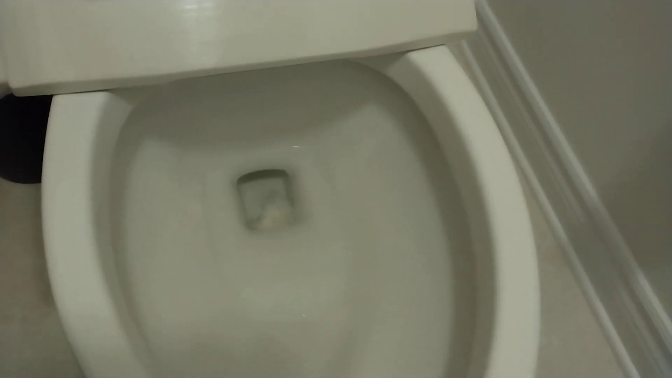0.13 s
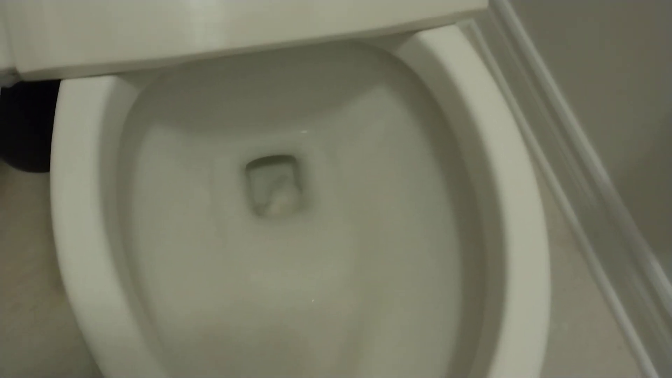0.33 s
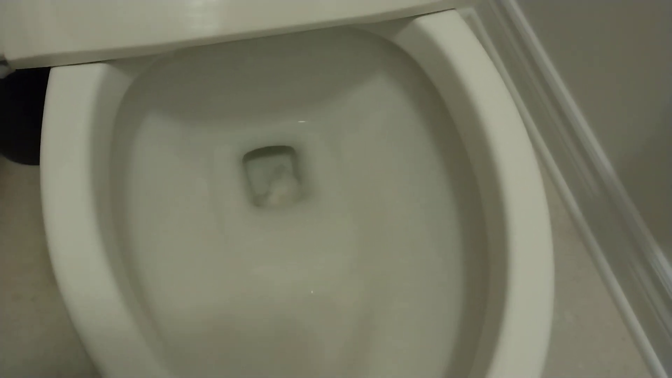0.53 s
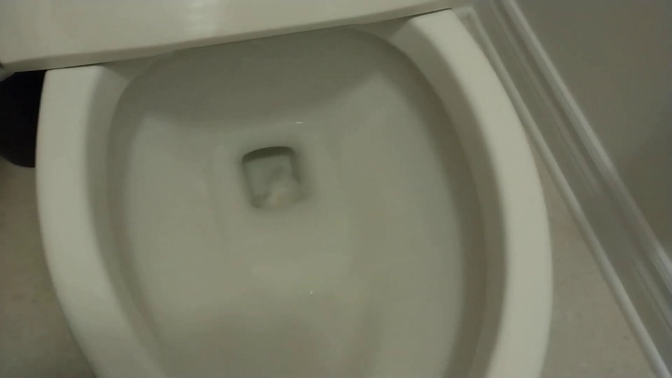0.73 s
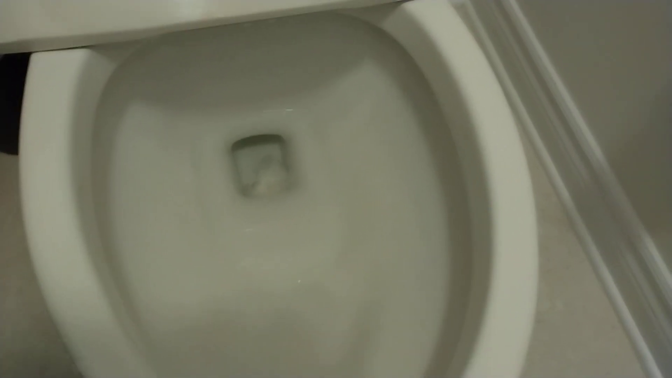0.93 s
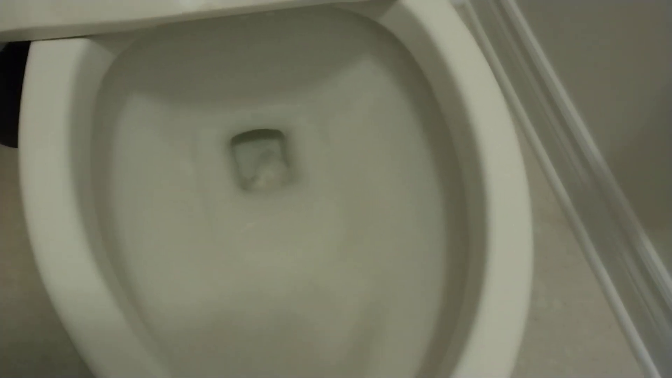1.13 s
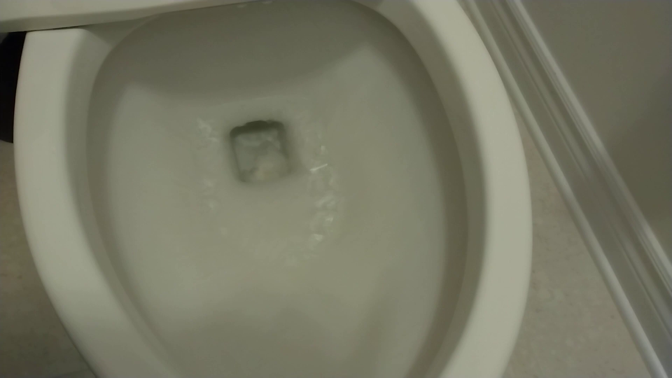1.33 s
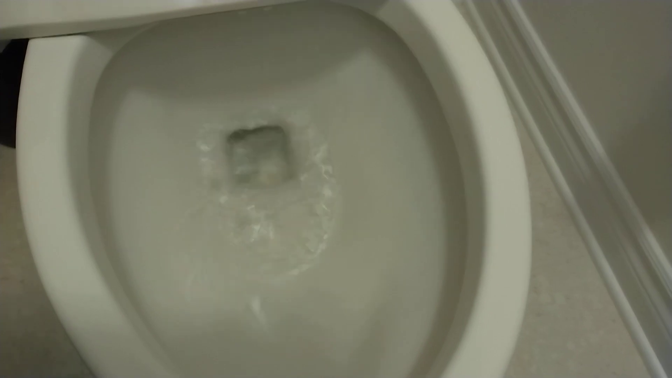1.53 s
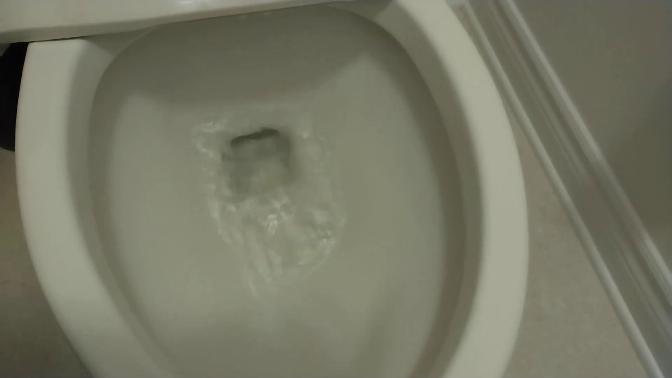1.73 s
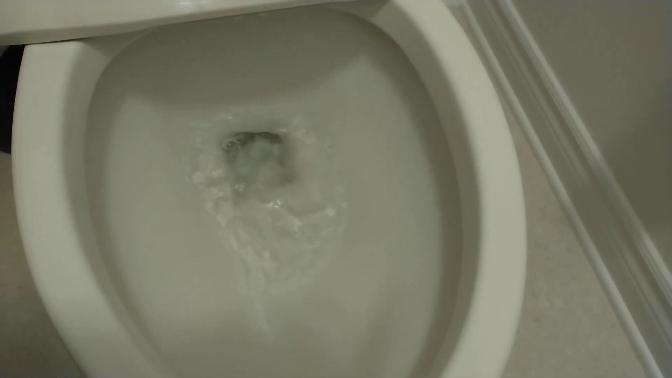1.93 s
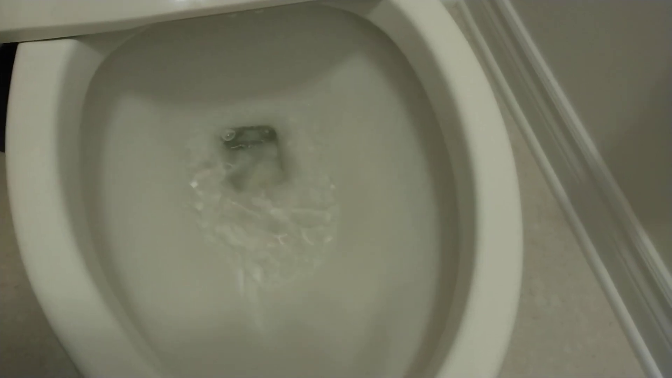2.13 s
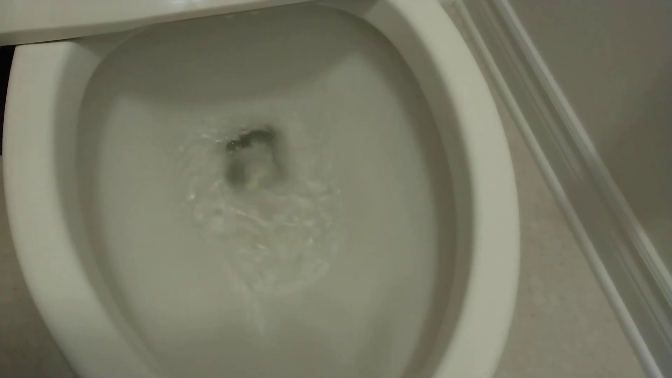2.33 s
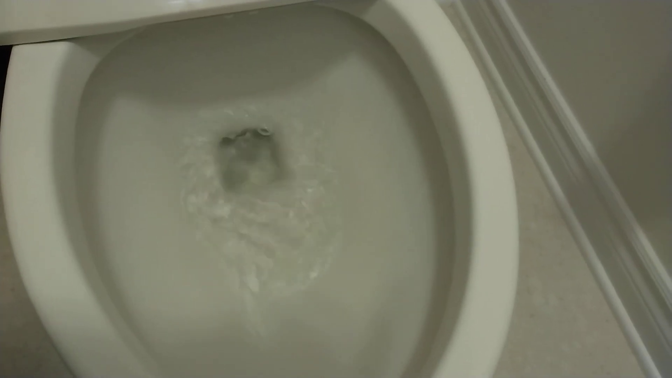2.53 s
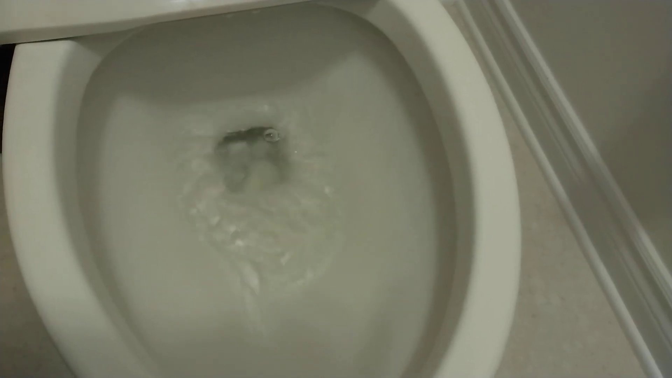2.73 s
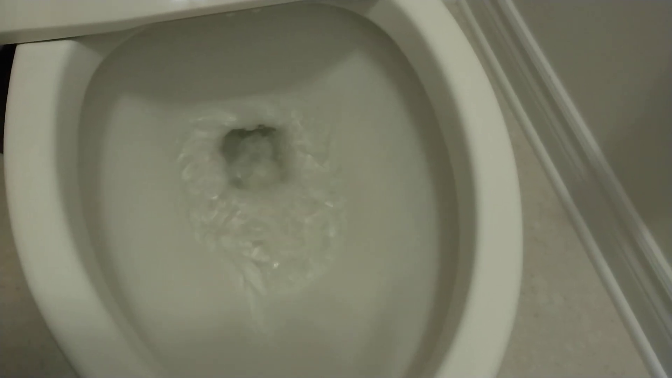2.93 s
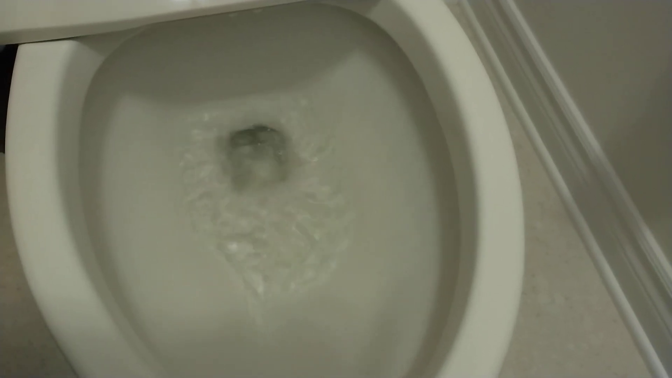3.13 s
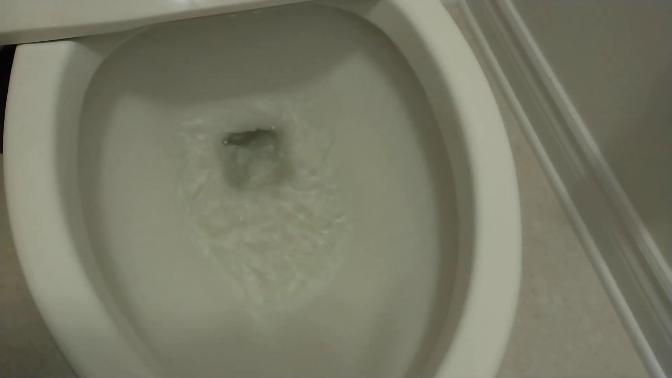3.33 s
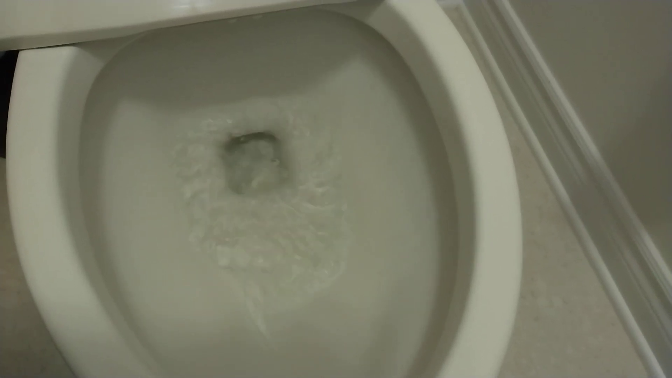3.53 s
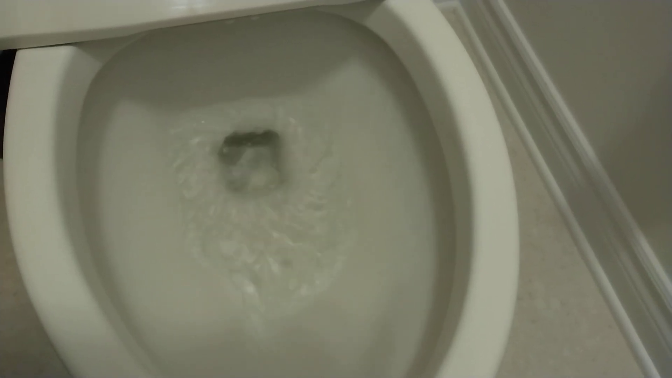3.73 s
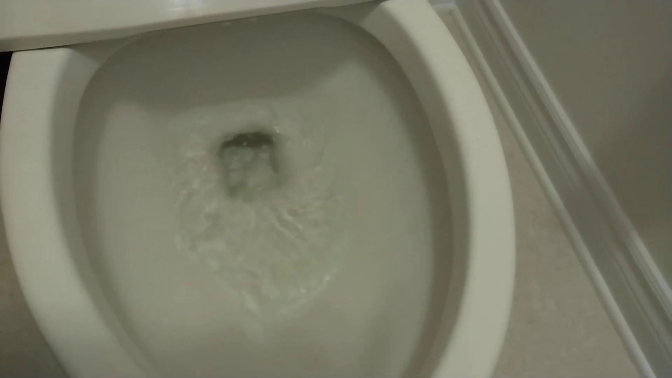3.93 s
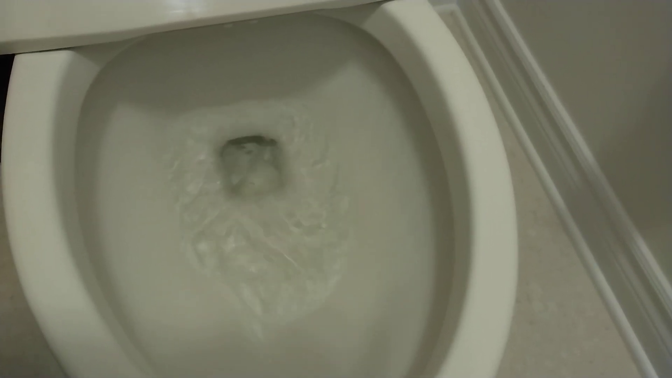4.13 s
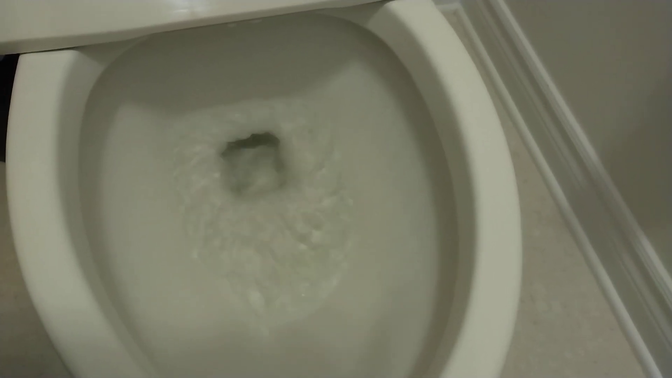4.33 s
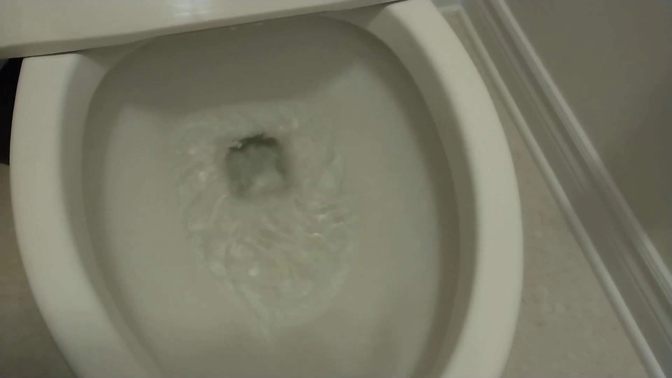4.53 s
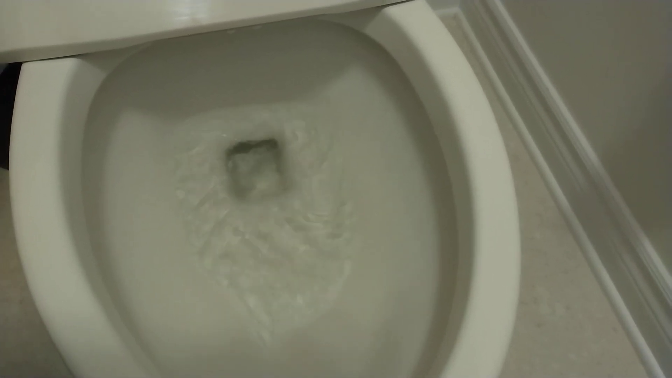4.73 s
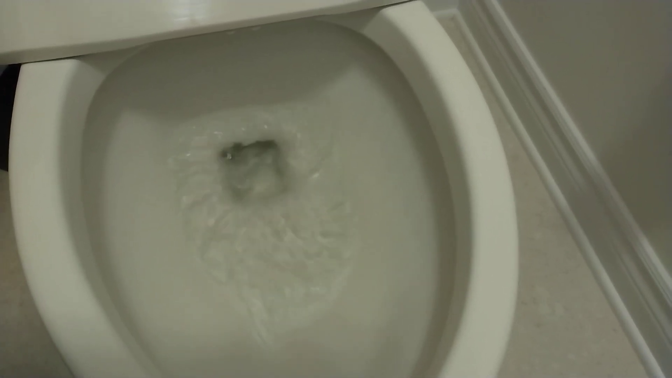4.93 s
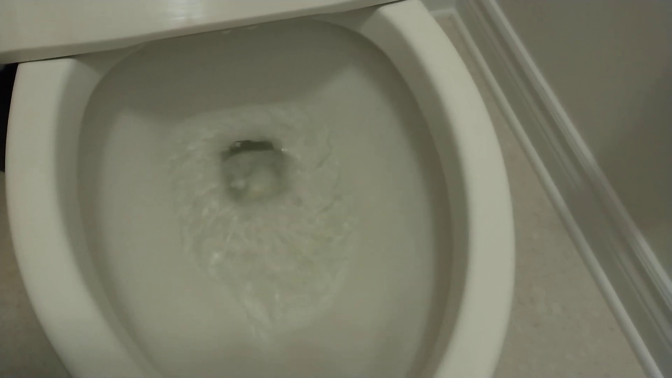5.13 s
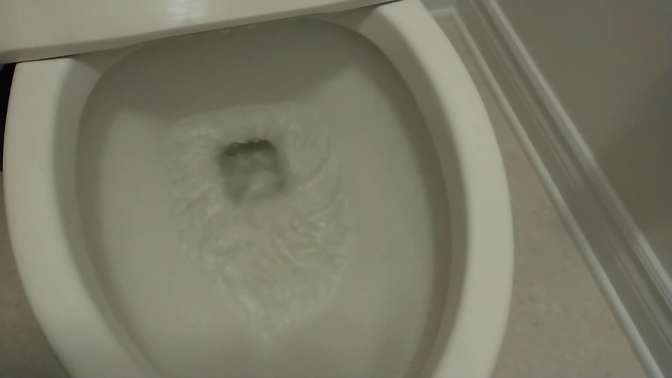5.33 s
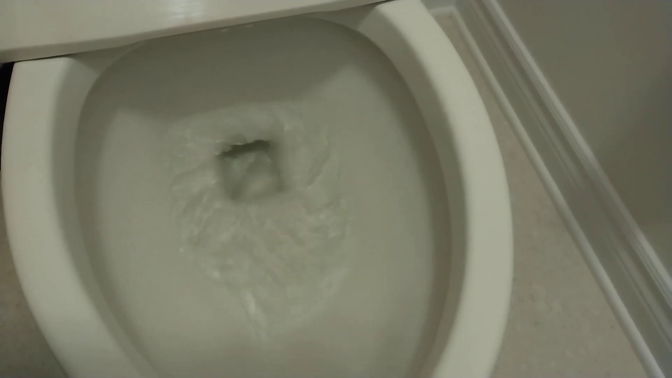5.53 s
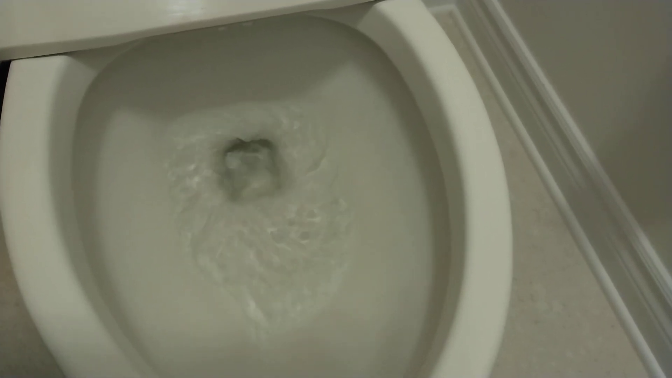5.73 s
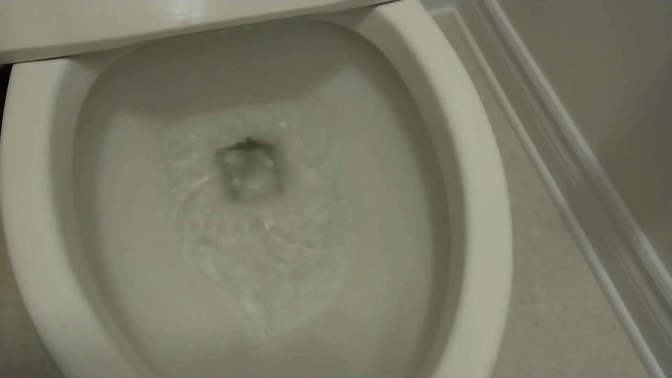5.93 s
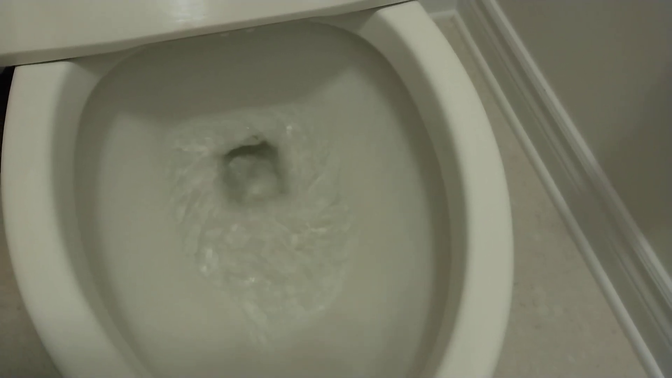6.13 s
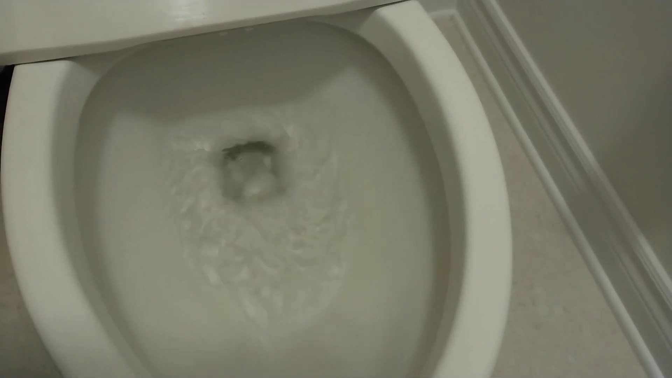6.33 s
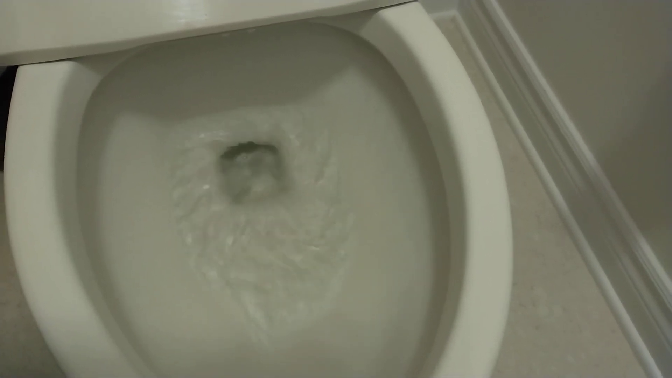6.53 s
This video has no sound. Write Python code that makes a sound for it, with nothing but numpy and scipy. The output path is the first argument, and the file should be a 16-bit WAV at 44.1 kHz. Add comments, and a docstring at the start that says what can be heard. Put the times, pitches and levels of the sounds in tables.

```python
"""Toilet flush, close up

A small quiet bathroom, one microphone just over the bowl. After a click and taps on the lever, water
gulps and splashes out of the rim, single bubbles plink in a lull, then a steady swirl rumbles in the
trap under scattered drops. The porcelain bowl colours and echoes the water; the drain hums below."""
import sys
import numpy as np
from scipy import signal
from scipy.fft import rfft, irfft
from scipy.io import wavfile
from scipy.ndimage import uniform_filter1d

SR = 44100
rng = np.random.default_rng(int(sys.argv[2]) if len(sys.argv) > 2 else 0)


def output_pcm(signal):
    """Save a mono or channel-first signal as 16-bit PCM at the path in sys.argv[1].

    Samples are clipped to [-1, 1] before scaling.
    """
    pcm = np.clip(np.atleast_2d(signal).T, -1, 1) * 32767
    wavfile.write(sys.argv[1], SR, np.round(pcm).astype(np.int16))


N = 295029
T = np.arange(N) / SR


def gain(db):
    """Decibels to amplitude."""
    return 10 ** (np.asarray(db) / 20)


def unit_rms(x):
    """Scales to an rms of one."""
    return x / np.sqrt(np.mean(x ** 2) + 1e-20)


def at_pitch(points, hz):
    """Reads a curve on a log-frequency axis."""
    f, value = np.transpose(points)
    return np.interp(np.log(hz + 1), np.log(f + 1), value)


def fader(rows, column=1):
    """Gain over time from a column of levels, silent before the first row."""
    rows = np.array(rows)
    return gain(np.interp(T, rows[:, 0], rows[:, column], left=-200))


def add(mix, start_s, sound):
    """Mixes a sound in at a time."""
    part = mix[round(start_s * SR):][:len(sound)]
    part += sound[:len(part)]


def faded(x, share):
    """Fades in and out; the two fades together take this share of the length."""
    return x * signal.windows.tukey(len(x), share)


def resonate(x, hz, width_hz):
    """Rings x through one resonance."""
    return signal.lfilter(*signal.iirpeak(hz, hz / width_hz, SR), x)


def churn(patchy_db, flicker_db, size):
    """Noise with drifting patches and a flicker shared by all pitches, in frames of size samples."""
    frames = 4 * N // size + 5
    real, imag, patches = rng.standard_normal((frames, size // 2 + 1, 3)).T
    patches = uniform_filter1d(patches, size=size // 64, axis=0)  # across pitch
    patches = unit_rms(uniform_filter1d(patches, size=9, axis=1))  # across time
    flicker = unit_rms(uniform_filter1d(rng.standard_normal(frames), size=3))
    spectra = (real + 1j * imag) * gain(patchy_db * patches + flicker_db * flicker)
    return unit_rms(signal.istft(spectra, nperseg=size, noverlap=3 * size // 4)[1][:N])


def burst(hz, octaves, t60):
    """Crackling noise around one pitch, sudden and short."""
    t, f = np.arange(4096) / SR, np.fft.rfftfreq(4096, 1 / SR)
    grit = rng.standard_normal(4096) * gain(4 * rng.standard_normal(4096))
    band = np.exp(-(np.log2((f + 1) / hz) / octaves) ** 2)
    crackle = unit_rms(irfft(rfft(grit) * band))
    return crackle * gain(-60 * t / t60) * (1 - np.exp(-t / 0.0015))


def ping(hz, t60, glide=0):
    """A dying sine, as of a ringing pocket of air; glide is in octaves a second."""
    t = np.arange(int(1.2 * t60 * SR) + 20) / SR
    turns = np.cumsum(np.minimum(hz * 2 ** (glide * t), SR / 4)) / SR
    attack = 1 - np.exp(-t * hz / .7)
    return np.sin(2 * np.pi * turns) * gain(-60 * t / t60) * attack


def swarm(lo_hz, hi_hz, per_s, cycles, spread_db, sizes=28):
    """Bubbles of many sizes, each climbing in pitch as it nears the surface; a few stand out."""
    out = np.zeros(N)
    strength = gain(spread_db * np.minimum(rng.exponential(1, N), 4))
    births = strength * (rng.random(N) < per_s / SR)
    size = rng.integers(0, sizes, N)
    for k, hz in enumerate(np.geomspace(lo_hz, hi_hz, sizes)):
        bubble = ping(hz, t60=cycles / hz, glide=.2 * hz / cycles)
        out += signal.oaconvolve(births * (size == k), bubble / np.linalg.norm(bubble) / np.sqrt(hz))[:N]
    tilt = np.clip(np.fft.rfftfreq(N, 1 / SR), lo_hz, hi_hz)  # evens the level per Hz
    return unit_rms(irfft(rfft(out) * tilt, N))


# resonances of the air in bowl and rim: f/Hz, width/Hz, relative level/dB
HOLLOWS = [(76, 12, -6), (197, 25, -3), (293, 50, 0), (425, 60, -1), (624, 38, 0), (762, 24, 0),
           (972, 50, 0), (1345, 70, -3), (1840, 60, -2), (2225, 50, -4), (2810, 110, -3), (3650, 90, -8),
           (5750, 80, -9)]


def coloured(x, spectrum, hollow_db):
    """Shapes x by a spectrum and the bowl's hollows, at unit rms; hollow_db sets how much they ring."""
    hz = np.fft.rfftfreq(len(x), 1 / SR)
    lift = sum(gain(hollow_db + db) / (1 + (2 * (hz - f) / width) ** 2) for f, width, db in HOLLOWS)
    return unit_rms(irfft(rfft(x) * gain(at_pitch(spectrum, hz)) * (1 + lift), len(x)))


# the bathroom's still air: f/Hz, relative level/dB
ROOM_SPECTRUM = [(15, -39.5), (25, -33), (108, -1.5), (141, -4.5), (550, -10), (812, -12), (1090, -17),
                 (1490, -17), (8400, -30.5), (10900, -95), (18500, -120)]


def room_tone():
    """The low, faint noise of the room, as heard over the bowl."""
    return gain(-72) * coloured(churn(1.2, .6, size=1024), ROOM_SPECTRUM, hollow_db=.5)


# whistles in the background: t/s, length/s, level/dB, f/Hz, width/Hz
WHISTLES = [(2.921, 0.45, -58, 756, 10), (4.053, 0.83, -63.5, 770, 22), (5.001, 1.8, -77.5, 6330, 58)]


def whistles():
    """The refilling pipework sings in narrow bands of noise that come and go softly."""
    out = np.zeros(N)
    for start, length, db, hz, width in WHISTLES:
        tone = resonate(rng.standard_normal(2 * SR), hz, width)[:int(length * SR)]
        add(out, start, gain(db) * faded(unit_rms(tone), .4))
    return out


# a short dull click at the very start, then taps on the lever: t/s, level/dB, f/Hz
CLICK_AND_TAPS = [(0.011, -31, 1500), (0.092, -41, 926), (0.517, -39, 1100), (0.556, -42, 1420)]
# squeaks of the lever's hinge: t/s, length/s, level/dB
HINGE_SQUEAKS = [(0.111, 0.13, -81.5), (0.557, 0.051, -76.5), (0.642, .04, -78.5)]
# modes of its metal: f/Hz, width/Hz, relative level/dB
LEVER_MODES = [(995, 58, 1.5), (1520, 17, 1), (2460, 69, -8), (5660, 80, -12)]


def click_and_lever():
    """A dull click; then taps on the lever, faint hinge squeaks and a first gurgle as the valve lifts."""
    out = np.zeros(N)
    for start, db, hz in CLICK_AND_TAPS:
        add(out, start, gain(db) * ping(hz, t60=.002))
    for start, length, db in HINGE_SQUEAKS:
        rub = rng.standard_normal(8192)[:int(length * SR)]
        squeak = sum(gain(level) * unit_rms(resonate(rub, hz, width)) for hz, width, level in LEVER_MODES)
        add(out, start, gain(db) * faded(squeak, .4))
    start_s, end_s = .555, .79
    gurgle = swarm(330, 620, per_s=160, cycles=42, spread_db=1.7, sizes=8)
    add(out, start_s, gain(-68) * faded(gurgle[:int((end_s - start_s) * SR)], .2))
    return out


# hum of the drain under the bowl during the surge: t/s, level/dB
DRAIN_LEVELS = [(0.5, -85), (0.78, -76), (0.86, -54.5), (1.07, -38), (1.2, -44), (1.4, -45.5), (1.5, -65),
                (1.62, -55), (1.8, -69), (1.95, -109), (2.1, -120)]


def drain_hum():
    """Noise rings in the drain's long air column; after the surge it follows the rumble and wavers."""
    hz, width, _ = HOLLOWS[0]
    peak = resonate(rng.standard_normal(N), hz, width)
    hum = unit_rms(resonate(peak, hz, width_hz=28))  # steepens the skirts
    waver_db = 3.5 * unit_rms(uniform_filter1d(rng.standard_normal(N), int(.2 * SR)))
    under_swirl = fader(SWIRL_LEVELS) ** .58 * gain(-40.5 + waver_db)
    return (fader(DRAIN_LEVELS) + under_swirl) * hum


# the swirl below the microphone: t/s, rumble level/dB, slosh level/dB
SWIRL_LEVELS = [(1.8, -54.5, -50), (1.95, -77, -91), (2.2, -75.5, -69), (2.6, -76, -76.5), (2.8, -66, -76),
                (2.92, -55, -52.5), (3.08, -46, -59.5), (3.65, -52.5, -60), (4.1, -56, -63.5),
                (4.4, -55.5, -58), (4.85, -56.5, -63.5), (5.1, -56.5, -59), (5.4, -57.5, -60.5),
                (5.63, -55, -58.5), (5.71, -55, -55.5), (5.85, -56.5, -60), (6.1, -55.5, -56),
                (6.19, -52.5, -53), (6.3, -60.5, -59.5), (6.44, -52.5, -54), (6.58, -60, -60.5)]
# trickle on the bowl's walls: t/s, level/dB
TRICKLE_LEVELS = [(1.8, -69), (1.95, -65), (2.25, -70.5), (2.6, -69), (2.85, -64), (3.3, -67.5), (4.5, -67),
                  (6.6, -71)]
# spectra of the three flows: f/Hz, relative level/dB
RUMBLE_SPECTRUM = [(65, -50), (110, -7), (166, -17), (255, -2.5), (340, -1), (460, -2.5), (640, -10.5),
                   (755, -6.5), (900, -30), (1980, -120)]
SLOSH_SPECTRUM = [(350, 4), (600, -5.5), (768, -7), (853, 5), (2100, 1.5), (2810, 2), (3600, -7.5),
                  (4680, -9), (7920, -120)]
TRICKLE_SPECTRUM = [(590, -96), (1000, -14), (2830, -14), (3510, -6), (6370, -8.5), (7620, -10),
                    (8400, -110), (10900, -63), (18500, -120)]


def swirl():
    """Low churning in the trap, sloshing round the bowl and a thin trickle down the walls."""
    rumble = churn(1.5, .8, size=1024) + .3 * swarm(150, 900, per_s=400, cycles=14, spread_db=2)
    slosh = churn(1.8, 1.5, size=512) + .4 * swarm(600, 3600, per_s=500, cycles=30, spread_db=2.5)
    trickle = churn(2, 1.5, size=256) + .55 * swarm(1000, 8300, per_s=300, cycles=45, spread_db=4)
    return (fader(SWIRL_LEVELS) * coloured(rumble, RUMBLE_SPECTRUM, hollow_db=-4)
            + fader(SWIRL_LEVELS, column=2) * coloured(slosh, SLOSH_SPECTRUM, hollow_db=0)
            + fader(TRICKLE_LEVELS) * coloured(trickle, TRICKLE_SPECTRUM, hollow_db=-8))


# the returning water: f/Hz, relative level/dB
GUSH_SPECTRUM = [(350, -46), (520, 9), (1100, 6), (1800, -10), (3000, -43.5)]


def gush():
    """Water runs back into the bowl: a smooth midrange rush that swells quickly and drains away."""
    start_s, rise_s, peak_db, fall_db_per_s = 2.797, .22, -49, 20
    t = np.maximum(T - start_s, 0)
    swell = np.minimum(t / rise_s, 1) ** 2
    fall = gain(peak_db - fall_db_per_s * np.maximum(t - rise_s, 0))
    return swell * fall * coloured(churn(1.1, .79, size=512), GUSH_SPECTRUM, hollow_db=.8)


# the drops that stand out at close range: t/s, level/dB, bubble f/Hz
LOUD_DROPS = [(1.8539, -39, 2165), (1.953, -51, 4130), (1.9715, -48, 5560), (1.995, -47, 3600),
              (2.0054, -47.5, 3020), (2.009, -47, 6030), (2.055, -42.5, 1535), (2.1047, -47, 2370),
              (2.137, -49, 6530), (2.1642, -40.5, 1372), (2.171, -44.5, 2870), (2.2509, -42, 3460),
              (2.3275, -45.5, 5490), (2.3448, -48, 953), (2.373, -42.5, 1960), (2.424, -39.5, 1106),
              (2.4574, -59, 2330), (2.468, -45, 5900), (2.5127, -33.5, 4510), (2.653, -46, 1620),
              (2.6618, -48, 3220), (2.7319, -32.5, 2593), (2.7834, -33, 6040), (2.808, -53, 1695),
              (3.0156, -44, 4880), (3.03, -42, 1113), (3.09, -45.5, 7340), (3.124, -52, 4830),
              (3.1595, -52, 7300), (3.342, -45.5, 4650), (3.4327, -44.5, 6340), (3.5115, -40, 2950),
              (3.5265, -38.5, 4300), (3.5837, -43.5, 4010), (3.7227, -41, 3240), (3.7415, -49, 6650),
              (3.847, -46.5, 1365), (3.905, -45.5, 4710), (4.026, -42.5, 2546), (4.062, -37, 3700),
              (4.1683, -51, 7400), (4.2388, -40, 4300), (4.338, -41, 2800), (4.441, -45, 4160),
              (4.489, -35.5, 2870), (4.6608, -43, 1176), (4.885, -50, 4060), (5.0801, -44.5, 3500),
              (5.1799, -43.5, 2900), (5.2623, -41.5, 2820), (5.4299, -45, 5610), (5.7088, -48, 1870),
              (5.9134, -45, 5650), (5.9525, -40.5, 3550), (6.36, -42.5, 3890), (6.4356, -49, 2730),
              (6.6683, -37.5, 3620)]
# big bubbles that glide until they burst: t/s, level/dB, f/Hz, t60/s, glide/(octaves a second)
BIG_BUBBLES = [(1.738, -28, 1060, 0.057, -3), (1.785, -36.5, 790, 0.092, -1),
               (2.432, -41.5, 1208, 0.32, 31)]


def plinks():
    """Each drop ticks and splats on the surface and traps a bubble; large bubbles ring longer."""
    out = np.zeros(N)
    when, size, pitch = rng.random((170, 3)).T  # a scatter of mostly fainter drips
    drip_s = 2 + when ** 3.2 * (T[-1] - 2)  # dense at 2 s, then thinning
    drip_db = -57.5 - 6.5 * (1 + np.log(1 - .98 * size))
    drip_hz = 2010 * (6750 / 2010) ** pitch
    for start, db, hz in [*LOUD_DROPS, *zip(drip_s, drip_db, drip_hz)]:
        ring_s = .014 + .093 * (1000 / hz) ** 2
        add(out, start, gain(db - 1.1) * ping(hz, ring_s, glide=1.4))
        add(out, start, gain(db - 9.5) * burst(1.044 * hz, octaves=.18, t60=.065))  # noisy ring
        add(out, start, gain(db - 8) * burst(1.45 * hz, octaves=.5, t60=.016))  # splat
        add(out, start, gain(db - 13) * burst(4500, octaves=1.3, t60=.006))  # tick
    for start, db, hz, t60, glide in BIG_BUBBLES:
        add(out, start, gain(db) * faded(ping(hz, t60, glide)[:1600], .3))  # gone after 36 ms
    return signal.sosfilt(signal.butter(10, 7700, fs=SR, output="sos"), out)


# water hitting porcelain just under the microphone: t/s, level/dB, centre f/Hz
SPLASHES = [(0.952, -28, 2220), (1.014, -14.5, 1700), (1.104, -18.5, 5160), (1.118, -19.5, 1840),
            (1.214, -34, 6100), (1.2641, -13, 956), (1.2822, -22, 5600), (1.317, -17, 2210),
            (1.3385, -5.5, 2150), (1.4911, -15.5, 3130), (1.5208, -15.5, 2820), (1.554, -24.5, 3170),
            (1.58, -11.5, 3380), (1.601, -15.5, 1930), (1.619, -12.5, 1420), (1.6436, -11.5, 3580),
            (1.725, -25.5, 3000), (1.738, -22, 1190), (1.7772, -24.5, 930)]


def splashes():
    """Water slaps the porcelain, and the air that it folds in rings for a moment."""
    out = np.zeros(N)
    for start, db, hz in SPLASHES:
        add(out, start, gain(db - 6) * burst(hz, octaves=.62, t60=.039))
        add(out, start, gain(db - 11.5) * ping(hz, t60=.013))
    return out


# the surge from the tank, out of the rim: t/s, gulp level/dB, coarse spray level/dB
SURGE_LEVELS = [(0.54, -75.5, -94), (0.735, -67, -80.5), (0.755, -80, -65.5), (0.82, -56, -59),
                (0.9, -23.5, -47.5), (1.0, -41.5, -47.5), (1.025, -33, -34), (1.09, -33, -40),
                (1.14, -31.5, -33.5), (1.2, -34, -41.5), (1.3, -30.5, -28), (1.345, -33.5, -17),
                (1.39, -49.5, -30), (1.475, -62.5, -51.5), (1.5, -39.5, -36), (1.55, -56, -41),
                (1.6, -25.5, -37), (1.645, -40, -27.5), (1.69, -38.5, -48.5), (1.83, -69, -60),
                (1.95, -107.5, -68)]
# spectra of its gulp and spray: f/Hz, relative level/dB
GULP_SPECTRUM = [(65, -57.5), (110, -10), (139, -21), (188, -13), (289, -4), (397, -18), (900, -17.5),
                 (1170, -36), (1980, -120)]
SPRAY_SPECTRUM = [(300, -51), (500, -4.5), (960, 4.5), (1800, 3.5), (4000, 1), (6900, 4), (7900, -4.5),
                  (8400, -33), (10000, -47.5)]


def surge():
    """Large bubbles gulp; coarse and fine spray hiss and spatter, brighter when strong."""
    bubbles = swarm(124.4, 974, per_s=300, cycles=12.9, spread_db=.84)
    gulp = coloured(bubbles + .29 * churn(2.2, 1.1, size=1024), GULP_SPECTRUM, hollow_db=2.7)
    spatter = swarm(500, 8300, per_s=1500, cycles=28, spread_db=3) + churn(3.5, 1.4, size=256)
    spray = coloured(spatter, SPRAY_SPECTRUM, hollow_db=6.5)
    coarse = unit_rms(signal.sosfilt(signal.butter(4, 4000, fs=SR, output="sos"), spray))
    fine = unit_rms(signal.sosfilt(signal.butter(4, 4000, "high", fs=SR, output="sos"), spray))
    force = fader(SURGE_LEVELS, column=2)
    brightness = gain(-1.5) * (force / gain(-30)) ** .31
    fade_out = np.clip((SURGE_LEVELS[-1][0] + .1 - T) / .1, 0, 1)
    return fade_out * (fader(SURGE_LEVELS) * gulp + force * (coarse + brightness * fine))


# decay inside the porcelain bowl: f/Hz, t60/s
BOWL_DECAY = [(200, 0.22), (1000, 0.19), (3000, 0.11), (7000, 0.054)]


def bowl_echoes(x):
    """Sparse echoes of random sign, one in every 24 samples, each band dying at its own speed."""
    taps = np.zeros(SR // 2)
    slots = np.arange(110, SR // 2 - 24, 24)
    taps[slots + rng.integers(0, 24, len(slots))] = rng.choice([-1., 1.], len(slots))
    hz, t, spectra = signal.stft(taps, SR, nperseg=256)
    decay = gain(-60 * t / at_pitch(BOWL_DECAY, hz)[:, None])
    tail = signal.istft(spectra * decay, SR, nperseg=256)[1]
    return signal.fftconvolve(x, tail / np.linalg.norm(tail))[:N]


def scene():
    """From just over the bowl, in mono: water, its echoes, the pipes, a click, the lever and the room."""
    drops = plinks() + splashes()
    flow = surge() + gush() + swirl()
    echoes = bowl_echoes(gain(-7.5) * drops + gain(-14) * flow)
    room = room_tone()
    return (drops + flow + echoes + drain_hum() + click_and_lever() + whistles() + room)[None]


def record(dry):
    """The microphone drops the deepest bass and rounds the peaks; then a band limit and faint hiss."""
    thinned = signal.sosfilt(signal.butter(3, 48, "high", fs=SR, output="sos"), dry)
    rounded = .9 * np.tanh(thinned / .9)
    lowpass = signal.firwin(1023, 8500, window=("kaiser", 10), fs=SR)
    hiss = gain(-101) * rng.standard_normal(dry.shape)
    return signal.oaconvolve(rounded, lowpass[None], "same") + hiss


dry = scene()
out = record(dry)
output_pcm(out)
```